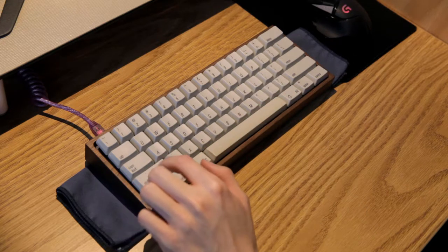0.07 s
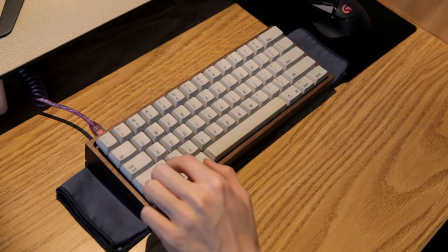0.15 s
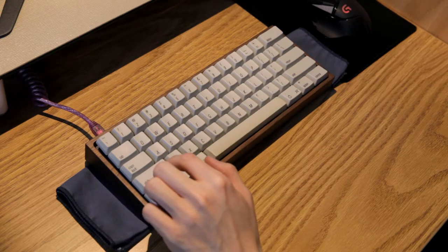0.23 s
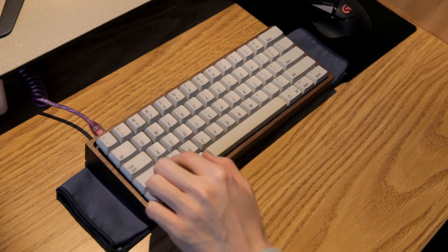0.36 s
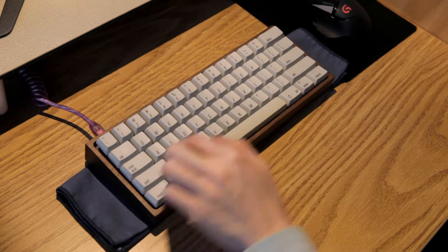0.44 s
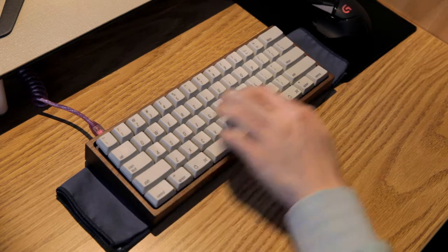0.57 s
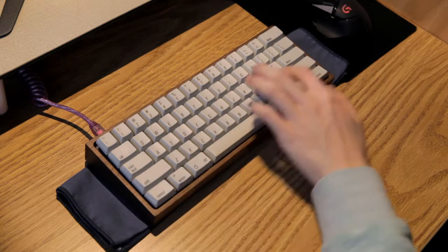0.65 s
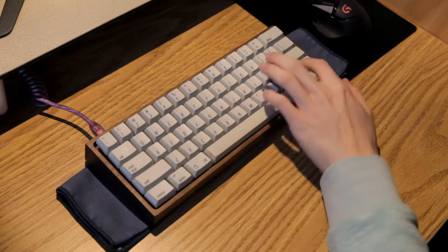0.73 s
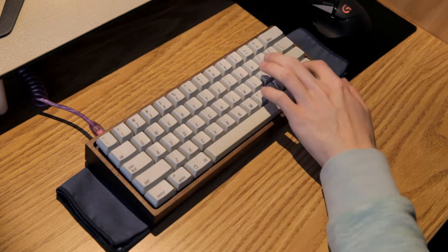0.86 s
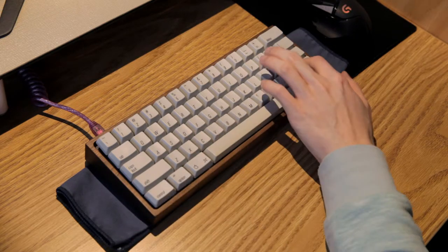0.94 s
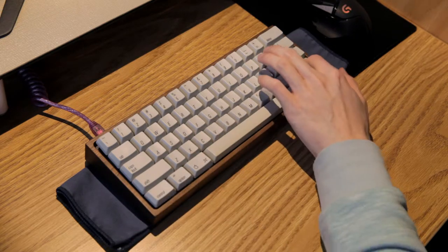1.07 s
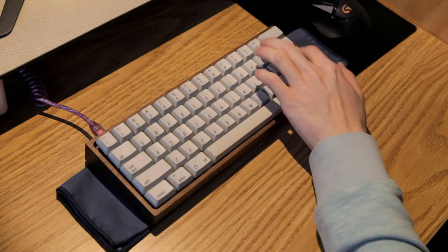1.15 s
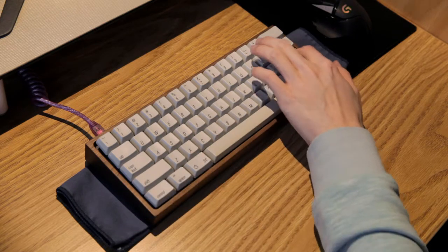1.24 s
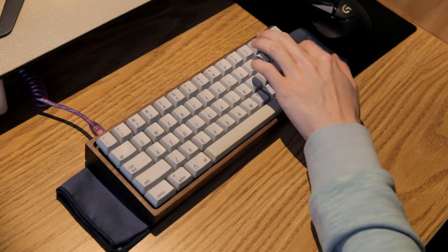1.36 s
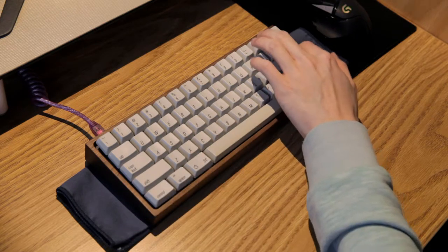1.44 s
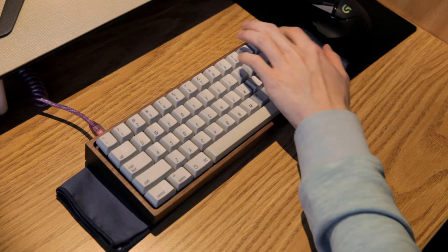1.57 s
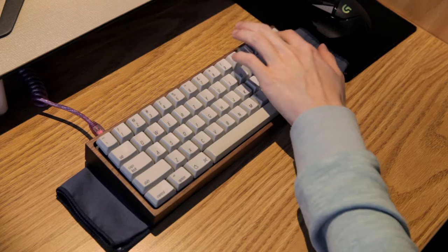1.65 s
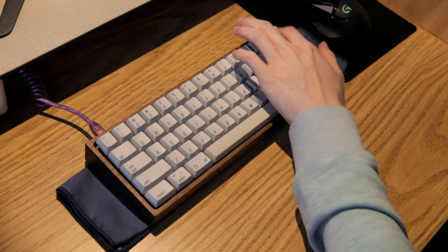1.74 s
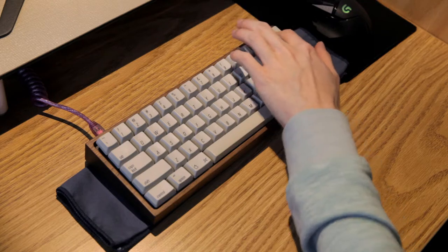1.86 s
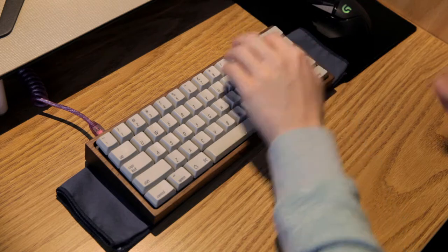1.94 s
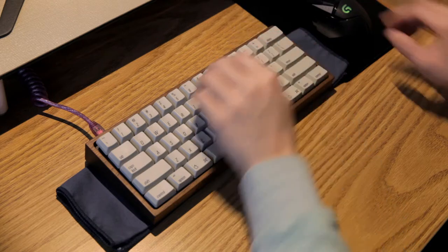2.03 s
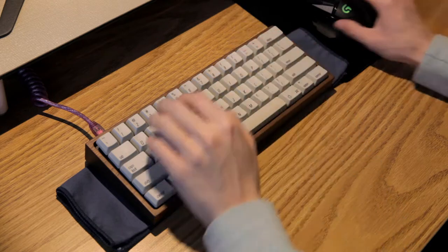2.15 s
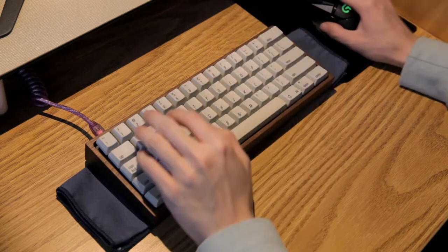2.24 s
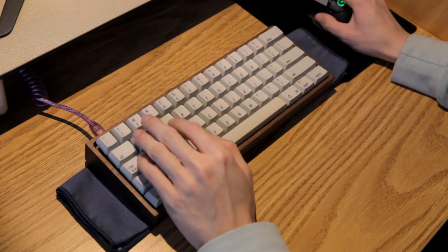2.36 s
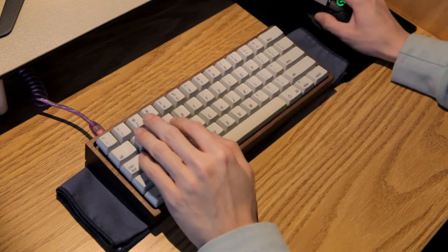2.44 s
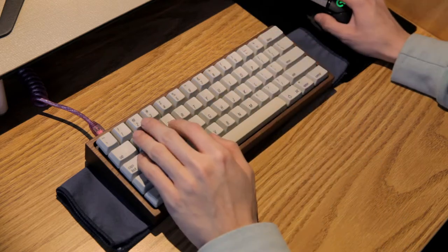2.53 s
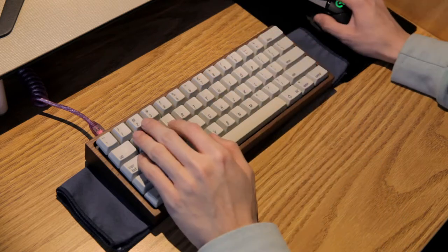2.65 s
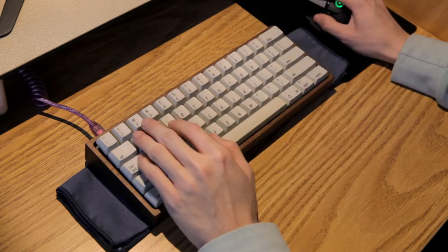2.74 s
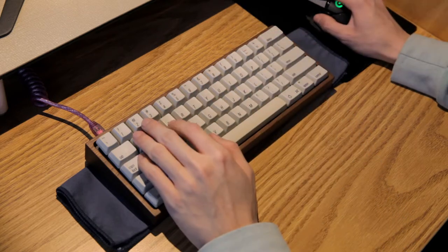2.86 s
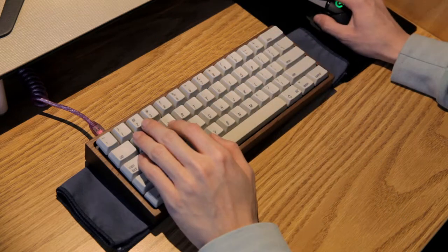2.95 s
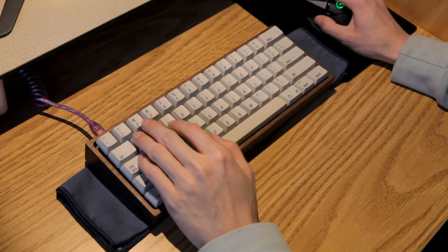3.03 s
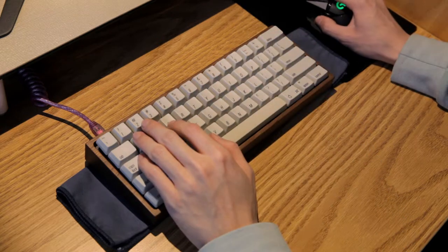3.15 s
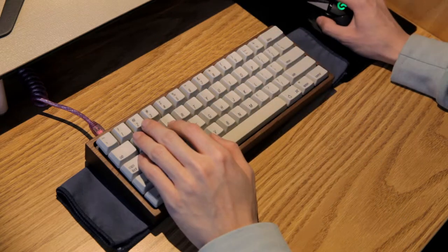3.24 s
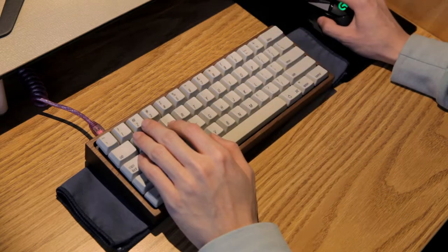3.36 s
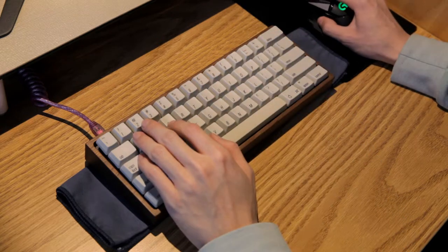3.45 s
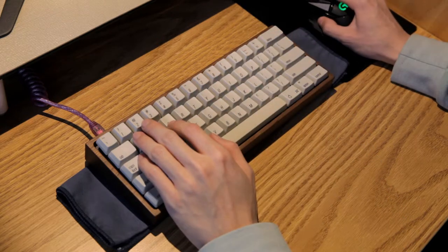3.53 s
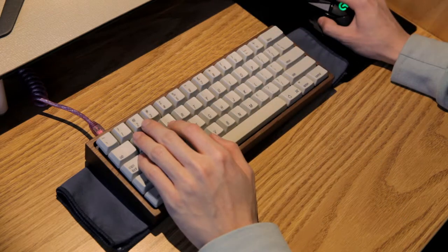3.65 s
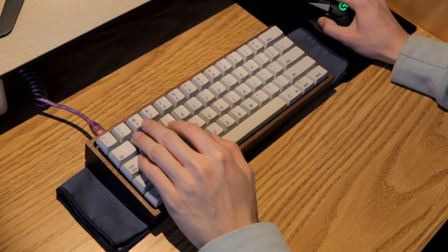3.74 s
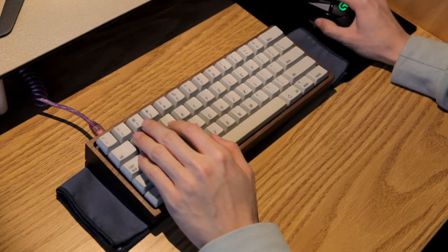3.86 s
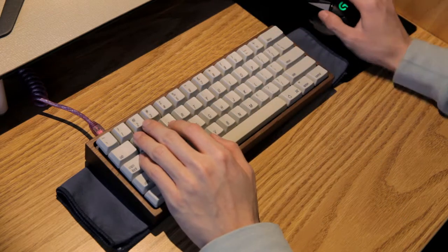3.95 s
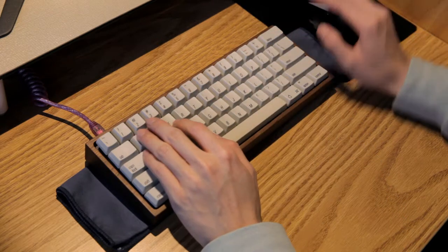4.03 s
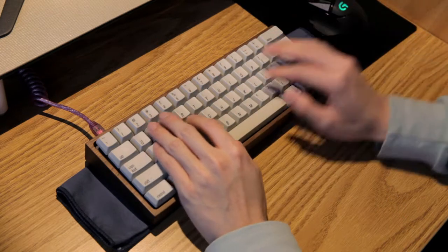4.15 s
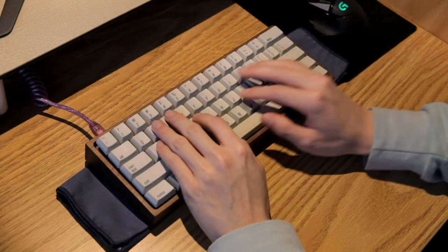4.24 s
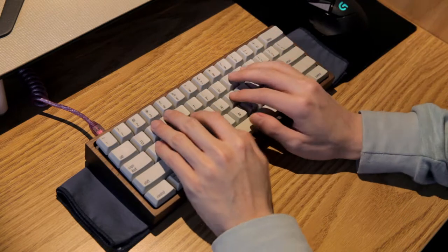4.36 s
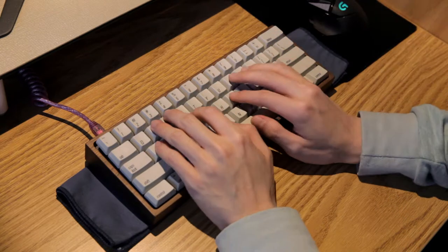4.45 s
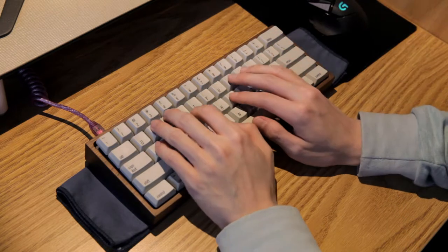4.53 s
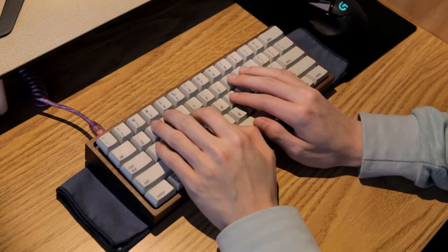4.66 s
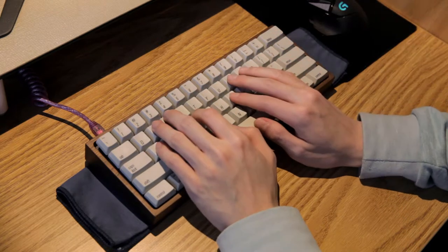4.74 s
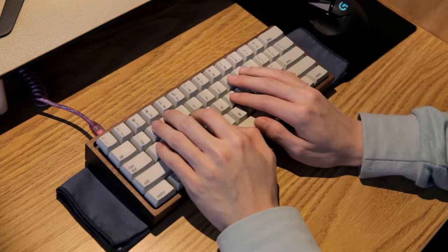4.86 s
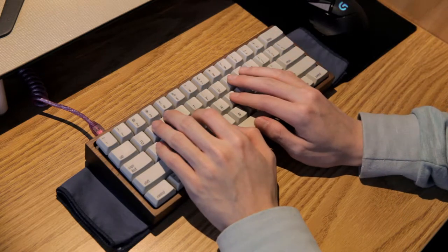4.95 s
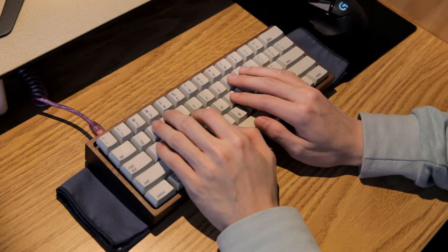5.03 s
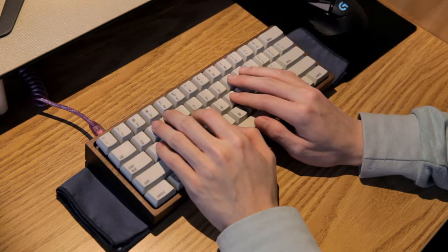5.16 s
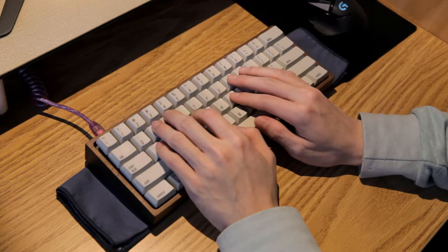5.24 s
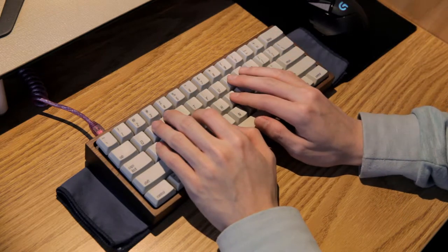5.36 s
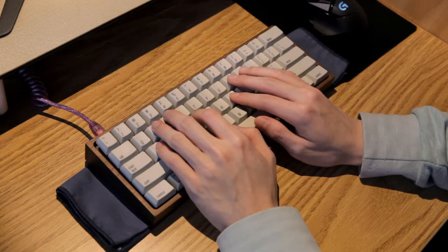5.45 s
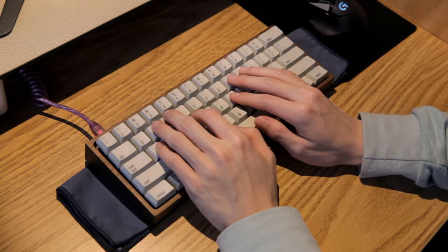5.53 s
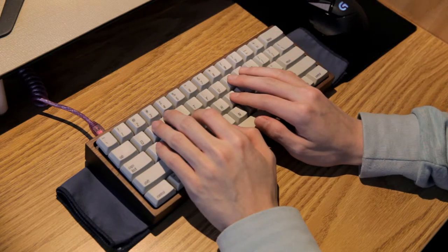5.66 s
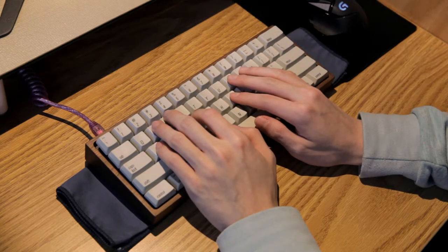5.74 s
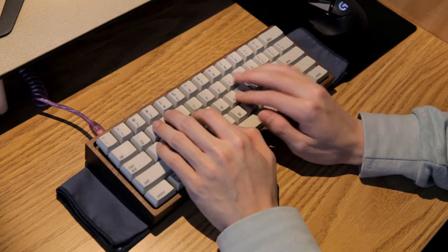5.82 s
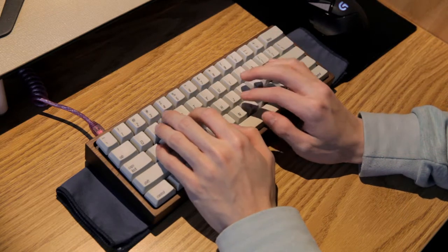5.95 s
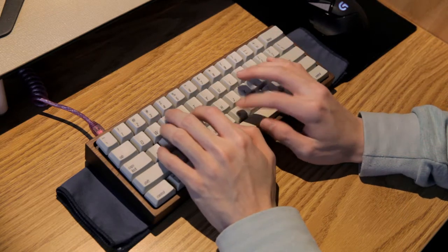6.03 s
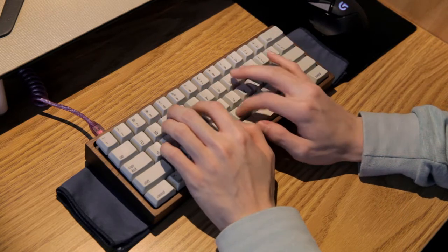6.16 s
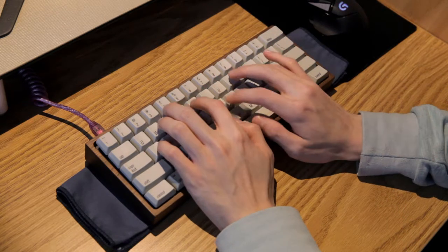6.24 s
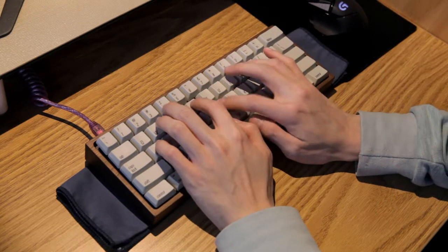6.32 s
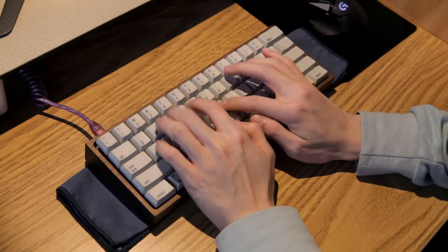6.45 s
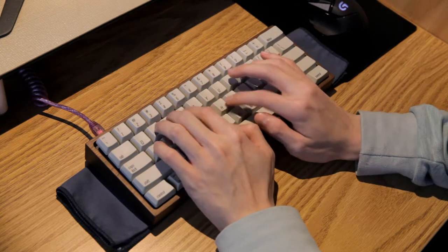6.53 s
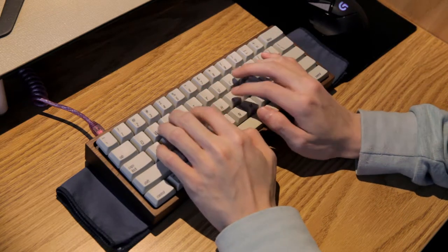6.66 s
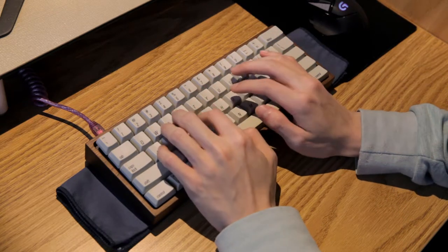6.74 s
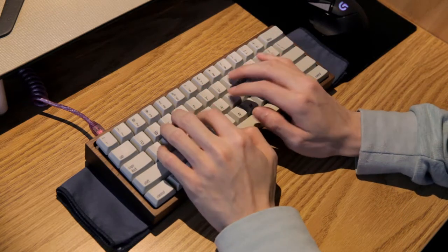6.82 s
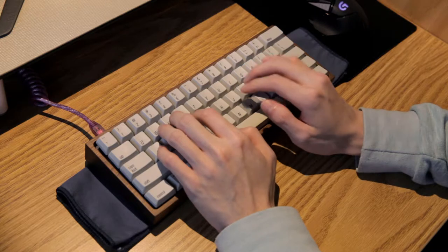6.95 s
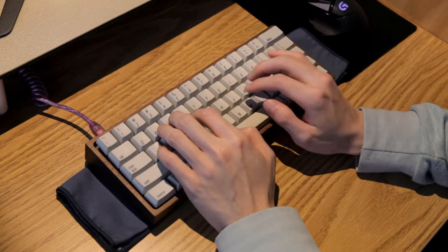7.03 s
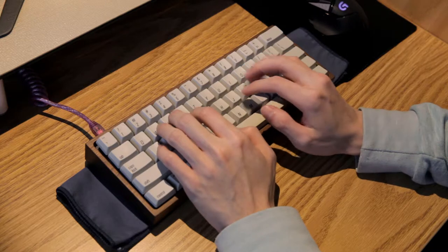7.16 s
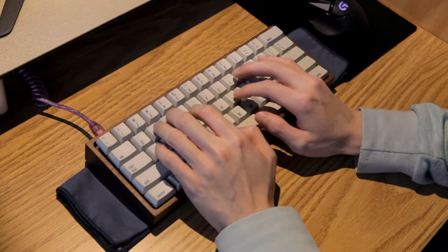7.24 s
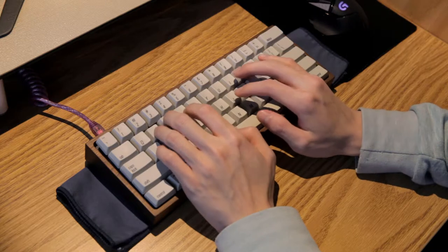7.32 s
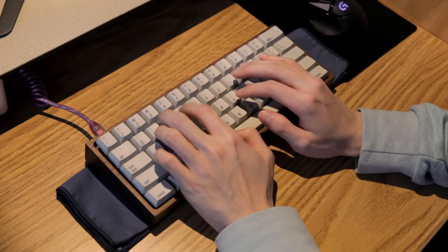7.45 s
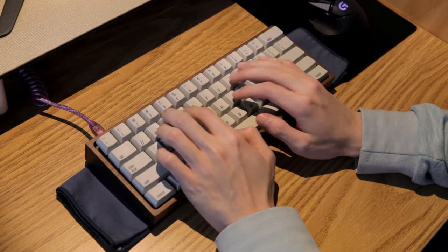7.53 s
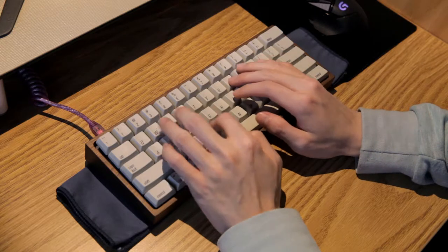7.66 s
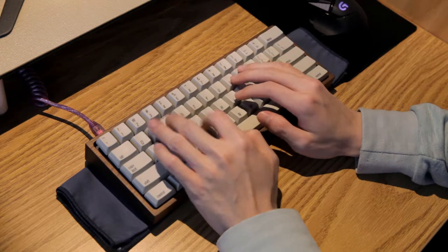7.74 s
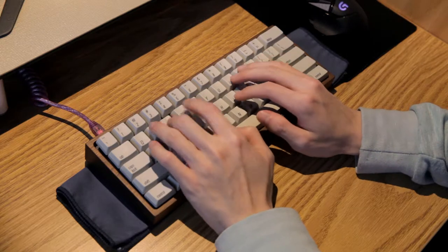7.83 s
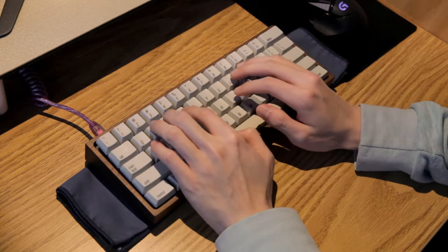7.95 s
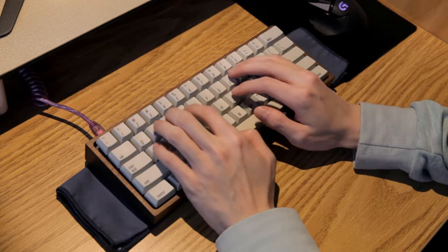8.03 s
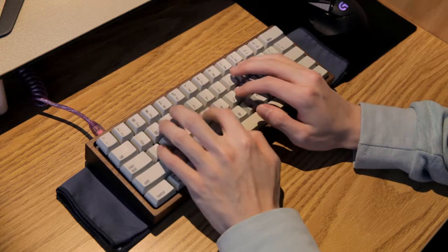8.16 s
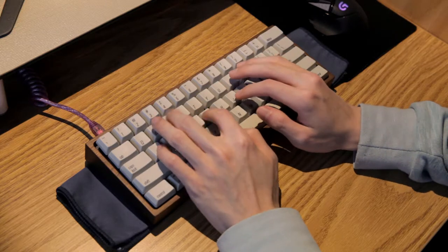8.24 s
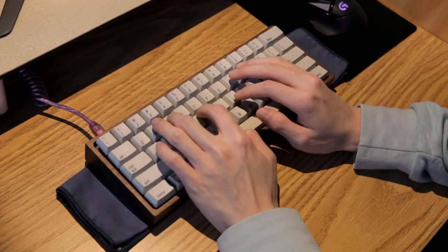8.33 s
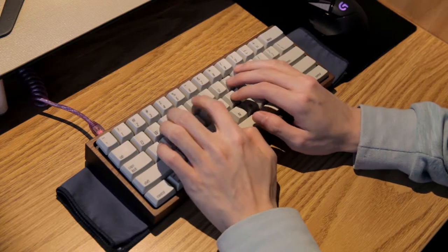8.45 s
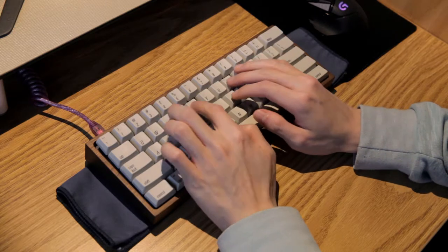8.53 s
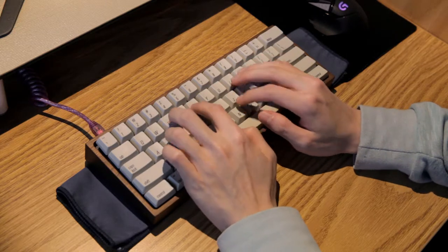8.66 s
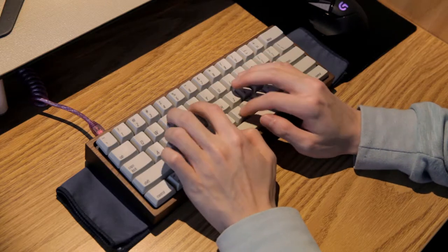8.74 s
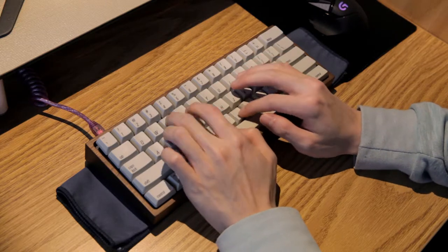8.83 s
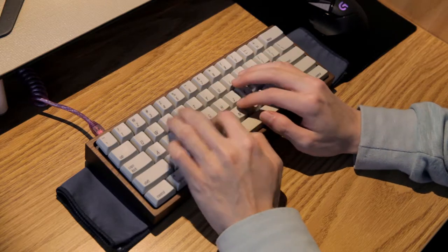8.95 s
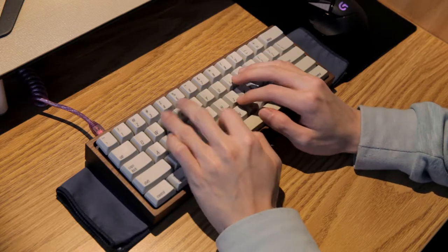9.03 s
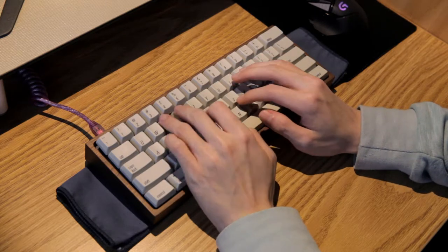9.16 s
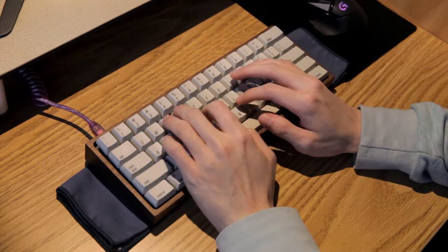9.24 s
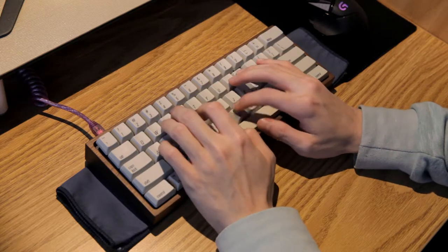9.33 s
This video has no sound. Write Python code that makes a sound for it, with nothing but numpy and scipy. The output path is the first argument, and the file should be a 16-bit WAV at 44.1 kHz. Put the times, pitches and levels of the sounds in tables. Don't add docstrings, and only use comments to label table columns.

```python
import sys
import numpy as np
from scipy import signal
from scipy.fft import rfft, irfft, next_fast_len
from scipy.io import wavfile
from scipy.ndimage import map_coordinates

SR = 44100
rng = np.random.default_rng(int(sys.argv[2]) if len(sys.argv) > 2 else 0)


def invert_db(x):
    u = np.asarray(x, float) / 20
    return 10 ** u


def generate_wav(signal):
    frames = np.transpose(np.atleast_2d(signal))
    scaled = np.clip(frames, -1, 1) * 32767
    pcm = np.round(scaled).astype(np.int16)
    wavfile.write(sys.argv[1], SR, pcm)


N = 414099

# (frequency [Hz], likeness [0-1])
NEAR_ALIKE = [(100, .997), (300, .93), (650, .8), (1400, .3), (3000, .1)]
# (frequency [Hz], density [dB per Hz])
LEAF_SPECTRUM = [(450, 3.5), (1500, 12.5), (3000, 8.5), (4500, 9), (7000, 6.5), (10500, 5.5), (15000, 0.5),
                 (16300, -34)]


def unit(x):
    return x / np.sqrt(np.mean(x ** 2) + 1e-20)


def along(points, hz):
    f, v = np.transpose(points)
    return np.interp(np.log(hz + 1), np.log(f + 1), v)


def wobble(rate_hz):
    knots = rng.standard_normal(int(N * rate_hz / SR) + 4)
    return map_coordinates(knots, [np.arange(N) * rate_hz / SR])


def filtered(x, response):
    n = x.shape[-1]
    m = next_fast_len(n + min(n, SR // 4))
    return irfft(rfft(x, m) * response(np.fft.rfftfreq(m, 1 / SR)), m)[..., :n]


def peak(hz, centre_hz, width_hz):
    return 1j * hz * width_hz / (centre_hz ** 2 - hz ** 2 + 1j * hz * width_hz)


def paired(two, alike, gain=lambda hz: 1):
    def mid_side_gain(hz):
        turn = np.arccos(np.clip(along(alike, hz), -1, 1)) / 2
        return gain(hz) * np.array([np.cos(turn), np.sin(turn)])

    mid, side = filtered(two, mid_side_gain)
    return np.array([mid + side, mid - side])


def rush(gain, alike=None):
    # (frequency [Hz], left-right likeness [0-1])
    far_alike = [(60, .998), (130, .98), (290, .82), (640, .2), (1400, 0)]
    if alike is None:
        alike = far_alike
    return unit(paired(rng.standard_normal((2, N)), alike, gain))


def add(track, s, sound, db, pan_db):
    sound = sound / np.abs(sound).max() * invert_db(db + np.array([[pan_db], [-pan_db]]) / 2)
    here = track[:, round(s * SR):round(s * SR) + sound.shape[1]]
    here += sound[:, :here.shape[1]]


def plateaus(rows, rise_db_s, fall_db_s):
    t = np.arange(N) / SR
    total = 0
    for start_s, end_s, db in rows:
        rise_db = rise_db_s * np.clip(start_s - t, 0, None)
        fall_db = fall_db_s * np.clip(t - end_s, 0, None)
        total = total + invert_db(db - rise_db - fall_db)
    return total


def background():
    # (start [s], end [s], level [dB])
    swell_rows = [
        (.35, .9, -58.5),
        (2.5, 3.12, -51),
        (3.4, 4, -66.5),
        (4.25, 4.56, -52.5),
        (5.1, 8, -55),
        (8.3, 9.6, -47.5),
    ]
    # (frequency [Hz], density [dB per Hz])
    air_spectrum = [(150, -42), (250, -14), (430, -17), (622, -16.5), (1050, -21), (15100, -42),
                    (16500, -51)]
    # (frequency [Hz], density [dB per Hz])
    rumble_spectrum = [(15, -12), (32, -1), (70, 12), (160, 12), (260, 3.5), (400, -36)]
    hum_hz, idle_db, air_db, rumble_db = 47.4, -82, -74.5, -65.5
    level = invert_db(idle_db) + plateaus(swell_rows, rise_db_s=59, fall_db_s=72)
    phase = 2 * np.pi * np.cumsum(hum_hz + .4 * wobble(1.5)) / SR
    hum = np.sqrt(2) * level * invert_db(np.array([[.4], [-.4]])) * np.sin(phase)
    hiss = invert_db(air_db + 8.5) * rush(lambda f: invert_db(along(air_spectrum, f)))
    drift_db = 1.5 * wobble(2)
    rumble = invert_db(rumble_db + drift_db) * rush(lambda f: invert_db(along(rumble_spectrum, f)))
    return hum + hiss + rumble


def strokes():
    # (landing [s], peak [dB], cap pitch [Hz], click ahead of landing [ms], click level [dB])
    edge_up_rows = [
        (.1724, -41, 1600, 3, -46),
        (.3283, -40.5, 1490, 2, -40),
        (.8507, -20.5, 1330, 10.8, -24),
        (1.04, -24.5, 1330, -2, -28),
        (1.2359, -29, 1400, 4.2, -27.5),
        (1.2444, -24, 797, -2, -29.5),
        (1.4111, -22.5, 847, 8.5, -25.5),
        (1.6351, -27.5, 657, 9.5, -25),
        (1.7799, -25, 854, 14.5, -24.5),
    ]
    edge_down_rows = [
        (.2444, -38, 604, 8, -50.5),
        (.4089, -35.5, 620, 6.5, -48),
        (.9502, -28.5, 917, 4, -27.5),
        (1.1264, -26, 660, 1, -24.5),
        (1.3372, -29.5, 617, -4, -43),
        (1.4908, -27, 758, 0.5, -26),
        (1.5031, -27.5, 830, -3, -49),
        (1.7003, -24, 814, -0.5, -27),
        (1.865, -25.5, 856, 6, -29.5),
    ]
    crisp_rows = [(5.8357, -38, 1490, 0, -48), (5.9419, -19, 2260, 6.5, -25.5),
                  (6.3574, -19.5, 1233, 5, -20), (6.4938, -20.5, 1930, 5.5, -21.5),
                  (6.5512, -18, 1330, 6, -23), (7.3098, -14, 1940, 7, -21.5),
                  (7.4921, -20, 1950, 6.5, -21.5), (7.5557, -21, 980, -6.5, -23.5),
                  (7.575, -17.5, 2140, 4.5, -21.5), (8.0522, -14.5, 2130, 5.5, -22),
                  (8.234, -28, 1930, 1.2, -21.5), (8.2874, -22, 1550, 8.5, -20.5),
                  (8.8467, -18, 1560, 5.5, -20.5), (9.066, -29.5, 2050, -1.5, -27),
                  (9.089, -18, 1620, 5, -18), (9.133, -20.5, 1960, 4, -22)]
    plain_rows = [(5.914, -39.5, 2080, 1, -54), (6.089, -17, 1590, 7.5, -20), (6.162, -38, 1560, -2, -22),
                  (6.3185, -22, 1980, 1, -25), (6.4785, -25.5, 2160, 1.5, -23),
                  (6.7457, -20.5, 2150, 6, -19.5), (6.8044, -18.5, 1710, 7.5, -24),
                  (6.9493, -24.5, 874, -2, -15.5), (7.0297, -22.5, 835, 2.4, -22.5),
                  (7.0822, -27.5, 890, -1.9, -23), (7.1024, -18, 1500, 5, -23.5),
                  (7.171, -21.5, 830, 9, -23.5), (7.2455, -14, 1710, 9.5, -21),
                  (7.6538, -28, 834, 1.5, -21), (7.7728, -21.5, 1880, 6.5, -20.5),
                  (7.8816, -18.5, 2090, 6, -18.5), (8.0951, -19, 1686, 6.3, -19.5),
                  (8.1794, -26, 2090, 1.2, -17.5), (8.1915, -25.5, 790, 7, -28),
                  (8.7743, -20.5, 1420, 0.5, -21), (8.7919, -20, 1010, 3.5, -28),
                  (8.9352, -22, 870, 2.5, -29), (8.9912, -23.5, 1010, 11, -19.5)]
    muffled_rows = [(5.7855, -39.5, 840, 9, -72), (6.1813, -16.5, 1650, 6.5, -23.5),
                    (6.3017, -19.5, 1620, 5.5, -19.5), (6.4099, -28, 850, 4, -27.5),
                    (6.721, -27.5, 2200, -1.5, -35), (6.8704, -22.5, 860, 4, -22.5),
                    (7.6825, -20.5, 954, 5, -21), (7.762, -19.5, 876, 0, -15.5),
                    (8.4357, -16, 1660, 12.5, -20.5), (8.5223, -15.5, 1600, 4.2, -21),
                    (8.6154, -26.5, 1490, .6, -27.5), (8.6329, -19, 2050, 8.5, -25),
                    (8.9502, -24.5, 755, -1.5, -24), (9.1434, -18, 912, 8.5, -19),
                    (9.3046, -13.5, 1760, 6, -20)]
    space_rows = [
        (6.6488, -17, 916, 12.2, -23.5),
        (7.3983, -19.5, 1190, 11.7, -24.5),
        (7.9732, -19.5, 943, 12, -24),
        (8.02, -29, 900, 1.2, -23.5),
        (8.3478, -17, 800, 10.7, -21.5),
        (8.709, -17, 970, 11, -22),
        (8.97, -21, 930, 4.8, -21),
        (9.2085, -17, 980, 10.6, -22.5),
    ]
    # (time [s], peak [dB], cap pitch [Hz])
    rebound_rows = [
        (5.7735, -45, 810),
        (6.7681, -24, 976),
        (6.96, -19.5, 1610),
        (7.231, -41, 1620),
        (7.873, -28, 1580),
        (8.272, -26, 1510),
        (8.412, -28, 1660),
        (8.7819, -20, 970),
    ]
    # (time [s], peak [dB], centre [Hz])
    lone_tick_rows = [(.832, -32.5, 4510), (.9418, -37, 4400), (1.025, -26.5, 10100), (1.1193, -32, 5080),
                      (1.3328, -29, 13000), (1.4876, -30.5, 10070), (1.6154, -34, 4400), (2.3645, -48, 5500),
                      (2.5077, -51.5, 4800), (4.3244, -44, 5400), (4.6558, -44, 3650), (5.8147, -45.5, 3760),
                      (6.0779, -20, 5760), (6.197, -36, 6940), (6.2032, -22, 5650), (6.2116, -34, 6610),
                  (6.5287, -31, 11200), (6.671, -32.5, 4230), (6.7456, -21.5, 5000), (6.7905, -24.5, 8050),
                  (6.846, -22.5, 5900), (7.1677, -28, 5000), (7.3412, -27, 5970), (7.4776, -27, 8000),
                  (7.9283, -26, 5170), (8.0256, -30, 5310), (8.1908, -22, 3200), (8.3261, -25, 9300),
                  (8.33, -26, 4400), (8.4593, -30, 5000), (8.514, -23, 3630), (8.588, -29, 10300),
                  (8.6933, -25.5, 4540), (8.756, -29.5, 4870), (8.8946, -23.5, 5400), (8.967, -14, 5260),
                  (8.9706, -20, 5090), (9.2815, -24, 11400), (9.344, -28.5, 4230), (9.3841, -27.5, 5810)]
    stem_db, stem_hz, rebound_body_db = -10.5, 5000, -20.5
    # (strokes, click centre [Hz], push into the desk [dB])
    kinds = [(edge_down_rows, 4900, -0.5),
             (edge_up_rows, 4660, -10),
             (space_rows, 14700, -7),
             (crisp_rows, 10960, -17.5),
             (plain_rows, 6800, -23),
             (muffled_rows, 5640, -15.5)]
    tick_rows = lone_tick_rows
    clack_rows = [(s, db, hz, rebound_body_db) for s, db, hz in rebound_rows]
    for rows, click_hz, body_db in kinds:
        for s, db, cap_hz, ahead_ms, click_db in rows:
            tick_rows = tick_rows + [(s - ahead_ms / 1000, click_db, click_hz)]
            tick_rows = tick_rows + [(s, db + stem_db, stem_hz)]
            clack_rows = clack_rows + [(s, db, cap_hz, body_db)]
    return tick_rows, clack_rows


def ticks(rows):
    out, t = np.zeros((2, N)), np.arange(-SR // 80, SR // 25) / SR
    after = np.clip(t, 0, None)
    snap = invert_db(-60 * after / 0.0055) * (1 - np.exp(-after / 0.00049))
    loose = np.where(t < 0, invert_db(-21.0 + 60 * t / 0.018), invert_db(-12.5 - 60 * t / 0.033))
    knots = rng.standard_normal((len(rows), 46))
    place = np.linspace(0, 44, len(t))
    bounces = invert_db(6 * np.array([np.interp(place, np.arange(45), k[1:]) for k in knots]))
    noise = rng.standard_normal((len(rows), 2, len(t)))
    noise = filtered(noise, lambda hz: invert_db(along(LEAF_SPECTRUM, hz)))
    for (s, db, hz), burst, bounce, side in zip(rows, noise, bounces, knots[:, 0]):
        sound = filtered(burst * (snap + loose * bounce), lambda f: .5 + peak(f, hz, hz / 5))
        add(out, s + t[0], sound, db + 4.0, -.5 + 4.0 * side)
    return out


def clacks(rows, cycles):
    # (frequency [Hz], density [dB per Hz])
    case_spectrum = [(200, -24), (450, -5.5), (900, 8.5), (2000, 9), (3000, -0.5), (5500, -15), (9000, -45)]
    pair_ratio, tall_hz = 1.75, 1250
    plate_hz = 865
    out, push, t = np.zeros((2, N)), np.zeros((3, N)), np.arange(SR // 12) / SR
    noise = rush(lambda hz: invert_db(along(case_spectrum, hz)), NEAR_ALIKE)
    noise = np.pad(noise, ((0, 0), (0, len(t))))
    rattle_gain = invert_db(-60 * t / 0.02) + invert_db(-4.0 - 60 * t / 0.099)
    rattle_gain = rattle_gain * (1 - np.exp(-t / 0.0007))
    chance = rng.standard_normal((len(rows), 4))
    for (s, db, hz, body_db), (a, b, c, d) in zip(rows, chance):
        at = round(s * SR)
        late = np.clip(t - np.abs([[b], [c]]) * .00007, 0, None)
        swell = np.sin(np.pi / 2 * np.clip(late * hz / 1.6, 0, 1)) ** 2
        partner_hz = hz / pair_ratio if hz > tall_hz else hz * pair_ratio
        partner_hz = partner_hz * (1 + 0.046 * a)
        cap = np.sin(2 * np.pi * hz * late) * invert_db(-60 * late * hz / cycles)
        cap += 0.48 * np.sin(2 * np.pi * partner_hz * late) * invert_db(-60 * late / 0.017)
        cap += 0.13 * np.sin(2 * np.pi * (plate_hz + 35 * b) * late) * invert_db(-60 * late / 0.053)
        case = filtered(noise[:, at:][:, :len(t)],
                        lambda f: 1.5 * (f / (f + hz)) ** 2 + peak(f, hz, hz / 4))
        add(out, s - .0004, cap * swell + 0.3 * case * rattle_gain, db + 0.5, -2.1 + 1.25 * d)
        push[at % len(push), at] += invert_db(db + body_db + 37.5)
    return out, push


def desk(push):
    # (frequency [Hz], width [Hz], level [dB])
    desk_modes = [(75.6, 16, 0.5), (120, 7.7, 6.5), (184.6, 8.2, 7), (213.2, 11.1, 5), (267.5, 24, 2),
                  (318.6, 8.6, 3), (386, 15.8, 1), (458, 110, -4), (521, 33.5, 0), (676, 290, -52)]
    # (start [s], let-go [s], level [dB])
    lean_rows = [
        (1.15, 1.19, -45),
        (1.5, 1.6, -55),
        (1.7, 1.74, -43),
        (2.01, 2.04, -46.5),
        (2.3, 2.37, -55.5),
        (4.68, 4.74, -57),
        (6.2, 9.6, -53.5),
        (6.55, 6.85, -54.5),
        (7.9, 8.0, -55),
    ]
    count = len(desk_modes)
    place_db = 2.5 * rng.standard_normal((count, len(push), 1, 1))
    height = np.arange(count)[:, None, None, None] / count
    place_db = place_db + 3 * rng.standard_normal((count, len(push), 2, 1)) * height
    sign = np.sign(rng.standard_normal((count, len(push), 1, 1)))

    def ringing(hz):
        return sum(sign[k] * invert_db(db + place_db[k]) * peak(hz, centre_hz, width_hz)
                   for k, (centre_hz, width_hz, db) in enumerate(desk_modes))

    impulse_response = filtered(signal.unit_impulse(SR // 2), ringing)
    thumps = signal.oaconvolve(push[:, None], impulse_response, axes=2).sum(axis=0)[:, :N]
    load = invert_db(-70.5) + plateaus(lean_rows, rise_db_s=130, fall_db_s=109)
    low = load * rush(lambda hz: np.abs(peak(hz, 119.6, 15.4)) ** 2, NEAR_ALIKE)
    upper = rush(lambda hz: np.abs(peak(hz, 180.7, 14)) ** 2 + np.abs(peak(hz, 216.2, 30)) ** 2,
                 NEAR_ALIKE)
    return thumps * invert_db([[-.3], [.3]]) + low + (invert_db(-68.0) + 0.47 * load) * upper


def room(x, count=3):
    # (frequency [Hz], t60 [s])
    decay_t60 = [(150, 1), (1000, 0.23), (4000, 0.3), (12000, 0.18)]
    hz, t, z = signal.stft(rng.standard_normal((count, 2, SR // 3)), SR, nperseg=256)
    tails = signal.istft(z * invert_db(-60 * t / along(decay_t60, hz)[:, None]), SR, nperseg=256)[1]
    turn = np.arange(N) * 12 // SR % count
    wet = 0
    for k, tail in enumerate(tails):
        answer = paired(tail, NEAR_ALIKE) / np.linalg.norm(tail[0])
        wet = wet + signal.oaconvolve(x * (turn == k), answer, axes=1)
    return np.pad(wet, ((0, 0), (130, 0)))[:, :N]


def sleeve():
    # (start [s], stop [s], level [dB])
    slide_rows = [
        (2.25, 2.37, -64),
        (3.94, 4.3, -67.5),
        (4.36, 4.5, -65),
    ]
    # (frequency [Hz], density [dB per Hz])
    cloth_spectrum = [(240, -34), (400, -8), (852, -7.5), (1990, -10), (6000, -17.5), (11800, -24.5),
                      (13000, -31), (16000, -40)]
    grain_db = .8 * wobble(25) + 2 * wobble(400)
    level = plateaus(slide_rows, rise_db_s=200, fall_db_s=181) * invert_db(4 + grain_db)
    return level * rush(lambda hz: invert_db(along(cloth_spectrum, hz)))


def mouse():
    # (time [s], peak [dB], left-right [dB], body [dB])
    mouse_rows = [
        (2.7866, -37.5, 2, -7.5),
        (2.8707, -36, -1, -17.5),
        (3.608, -38, 2, -9),
        (3.704, -37.5, 0, -15.5),
    ]
    # (frequency [Hz], width [Hz], level [dB])
    spring_bands = [(2310, 360, -5), (3870, 920, -3), (5600, 1500, -2), (7000, 900, -4), (9860, 900, 1.5),
                    (11000, 1100, -2), (13100, 1200, -4.5)]
    out, push, t = np.zeros((2, N)), np.zeros((1, N)), np.arange(SR // 8) / SR
    for s, db, pan_db, body_db in mouse_rows:
        noise = rng.standard_normal((2, 2, len(t)))
        spread_db = 1.2 * rng.standard_normal(len(spring_bands))

        def bands(f):
            return sum(invert_db(level_db + d) * peak(f, hz, width_hz) ** 2
                       for (hz, width_hz, level_db), d in zip(spring_bands, spread_db))

        buzz = filtered(noise[0] * (invert_db(-60 * t / 0.023) + invert_db(-18.0 - 60 * t / 0.23)), bands)
        crack = filtered(noise[1], lambda f: invert_db(along(LEAF_SPECTRUM, f))) * invert_db(-60 * t / 0.018)
        add(out, s, buzz + crack / 10, db + 3.5, pan_db)
        push[0, round(s * SR)] += invert_db(db + body_db + 40.5)
    return out, push


def scene():
    # (time [s], peak [dB], pitch [Hz], body [dB])
    touch_rows = [(2.0124, -52, 2800, -27), (2.033, -51, 2920, -24), (2.365, -43, 760, -3),
                  (2.51, -46.5, 915, -11), (3.774, -48, 720, -4), (4.086, -50, 630, -11),
                  (4.107, -41, 1960, -11), (4.322, -45, 802, -17), (4.336, -42, 784, -15),
                  (4.362, -38.5, 865, -20), (4.391, -44.5, 1180, -17), (4.658, -38, 893, -8)]
    tick_rows, clack_rows = strokes()
    caps, cap_push = clacks(clack_rows + touch_rows, cycles=18.7)
    switch, switch_push = mouse()
    leaves = ticks(tick_rows) + switch
    wet = room((invert_db(-7.5) * leaves + invert_db(-7.5) * caps).mean(axis=0, keepdims=True))
    thumps = desk(cap_push + switch_push / 2)
    return leaves + caps + wet + thumps + sleeve() + background()


def roll_off(x):
    return signal.sosfilt(signal.butter(12, 16980, fs=SR, output="sos"), x)


def record(dry):
    return roll_off(dry)


dry = scene()
out = record(dry)
generate_wav(out)
```